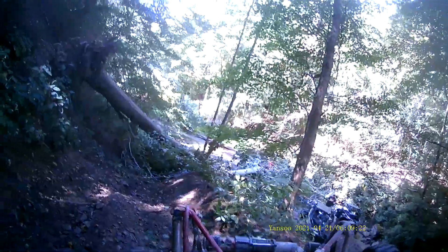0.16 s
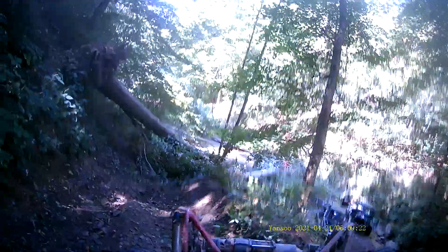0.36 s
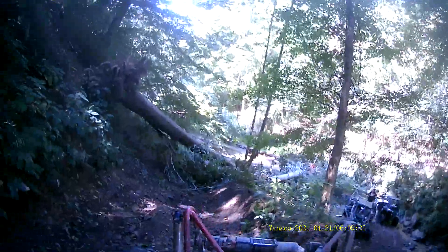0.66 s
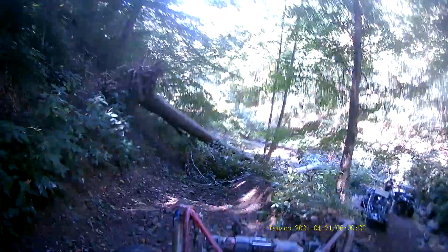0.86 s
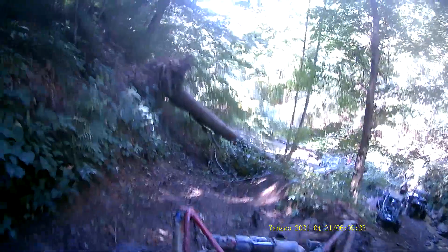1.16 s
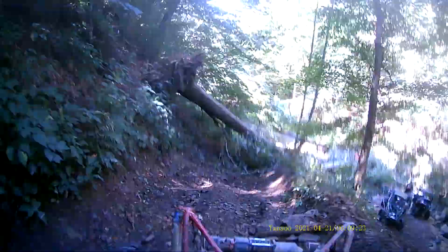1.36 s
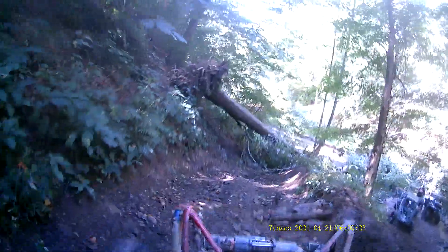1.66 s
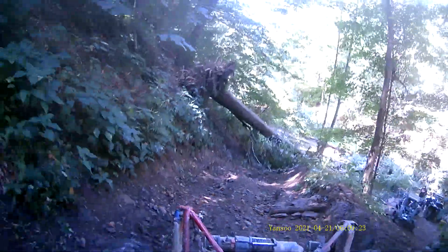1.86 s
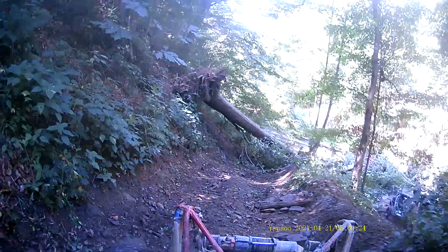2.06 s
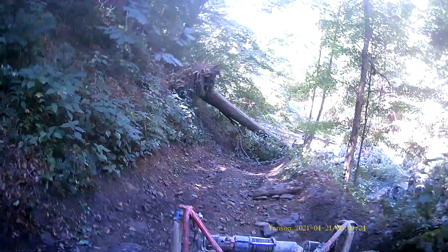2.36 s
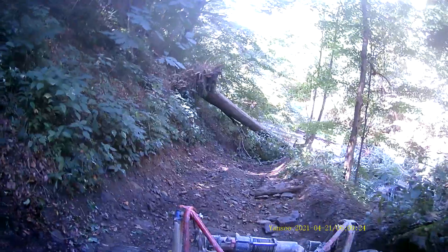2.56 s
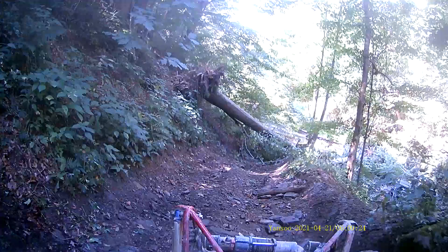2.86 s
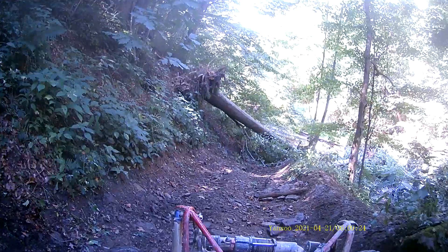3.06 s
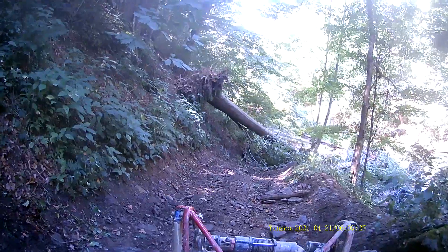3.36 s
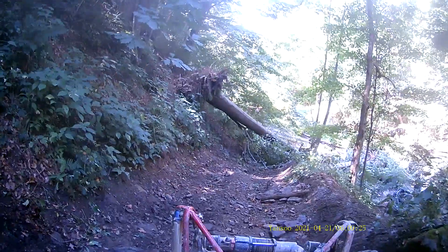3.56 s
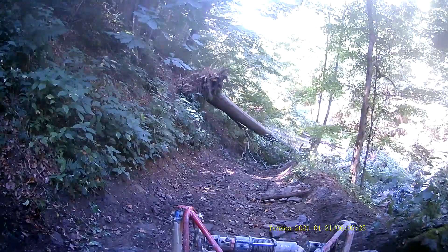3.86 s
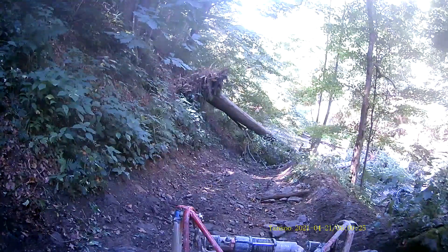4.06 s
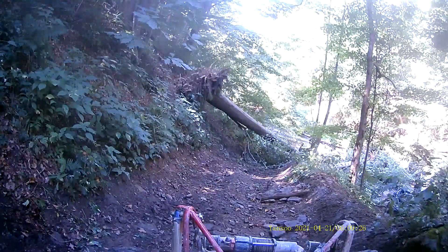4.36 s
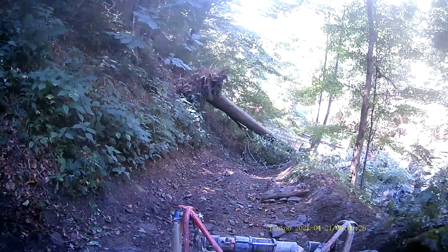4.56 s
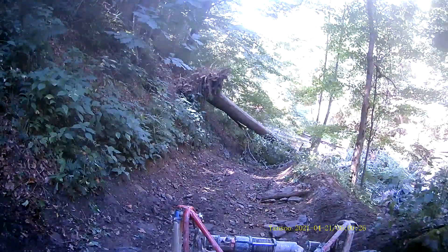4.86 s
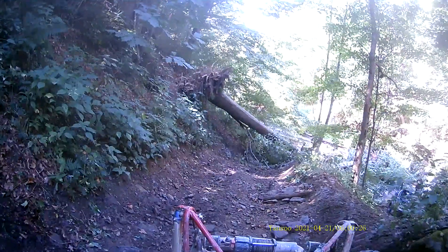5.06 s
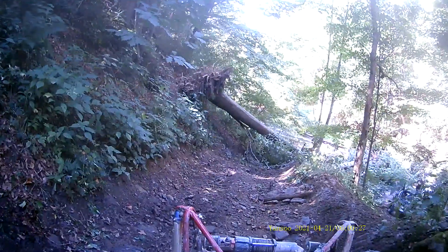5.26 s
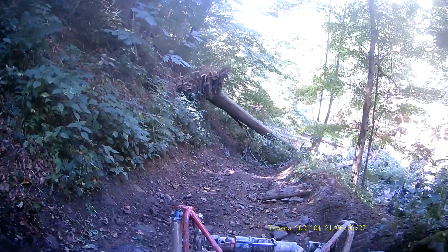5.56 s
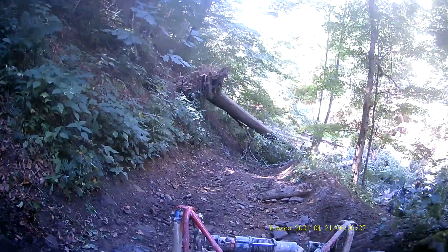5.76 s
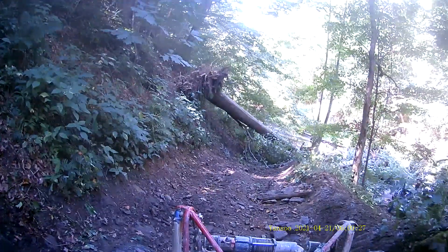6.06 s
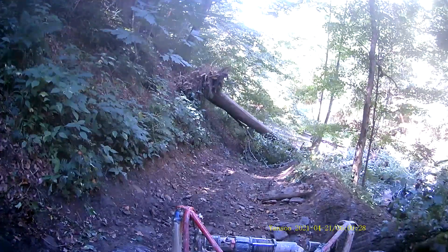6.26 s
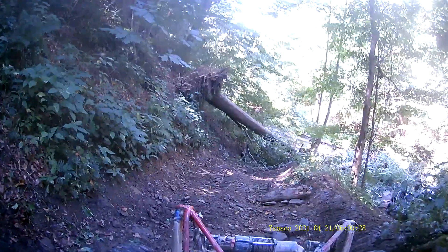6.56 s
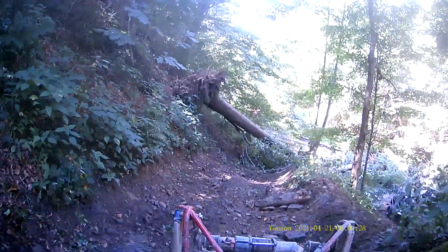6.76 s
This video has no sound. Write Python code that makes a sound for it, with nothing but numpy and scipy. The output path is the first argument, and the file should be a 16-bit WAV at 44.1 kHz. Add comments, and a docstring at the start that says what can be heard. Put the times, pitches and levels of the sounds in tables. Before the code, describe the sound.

Heard from a microphone on the frame of a small buggy on a wooded dirt trail: a two-cylinder engine growls, drops quickly to a chugging idle with gear rumble and loose metal knocks, putters steadily, nearly stalls, revs hard, falls back and starts to pick up. The sound is dull, narrow-band and flattened by overload.

```python
"""Small buggy engine, heard up close

A two-cylinder engine drops from a rev to idle, stumbles, revs hard, coasts down and picks up again.
Each firing is a pulse that rings the silencer and pipe; filtered noise makes the gas puffs and gear rumble.
Loose metal knocks are fading tones with bursts of noise, a bump is one low tone, a squeak two gliding ones.
An overloaded microphone on the frame flattens the peaks, at a low sample rate and again at the full one."""
import sys
import numpy as np
from scipy import signal
from scipy.fft import rfft, irfft, next_fast_len
from scipy.io import wavfile
from scipy.ndimage import uniform_filter1d

SR = 44100
rng = np.random.default_rng(int(sys.argv[2]) if len(sys.argv) > 2 else 0)


def waveform_to_disk(signal):
    """Save audio, clipped to [-1, 1], as 16-bit WAV at the path in sys.argv[1]."""
    frames = np.transpose(np.atleast_2d(signal))
    scaled = np.clip(frames, -1, 1) * 32767
    samples = np.round(scaled).astype(np.int16)
    wavfile.write(sys.argv[1], SR, samples)


def to_linear_factor(level_db):
    """Convert decibel levels (scalar or array-like) to linear amplitude factors."""
    exponent = np.asarray(level_db, float) / 20
    return 10 ** exponent


N = 305172  # length in samples

# A thin squeak. Each row: start in seconds, length in seconds, first pitch in Hz, last pitch in Hz, level in dB.
SQUEAKS = [(4.05, .15, 2850, 2930, -43), (4.22, .07, 2810, 2790, -47)]
# Knocks of loose metal. Each row: time in seconds, level in dB, extra dB for the tones under 2 kHz.
KNOCKS = [(.703, -13, 6), (1.117, -18, -2), (1.349, -21, -9), (1.971, -22, -8), (2.986, -24, 9),
          (5.119, -20, 6), (6.305, -21, 2), (6.565, -21, 3)]
# Tones of the loose metal. Each row: pitch in Hz, relative level in dB, time to fade by 60 dB in seconds.
METAL_TONES = [(720, -2, .04), (1300, 0, .03), (1750, -5, .025), (2600, -5, .025), (3700, -5, .025)]
# Bumps of the frame. Each row: start in seconds, level in dB before its fade and soft onset, pitch in Hz.
BUMPS = [(4.755, 2, 103)]
# Gear noise. Each row: time in seconds, level in dB.
GEAR_NOISE = [(0, -6), (.5, -11), (.68, -18), (.9, -17), (1.5, -28), (2.5, -30), (5, -35), (5.3, -23),
              (5.9, -21), (6.05, -18), (6.4, -19), (6.7, -13.5), (6.92, -11)]
# Resonances of the gear casing. Each row: centre in Hz, width in Hz, relative strength with its sign.
CASING_MODES = [(312, 414, 0.84), (496, 154, -1.313), (713.4, 47, 0.7), (1330, 270, -0.18)]
# Engine speed. Each row: time in seconds, firings per second.
FIRING_RATE = [(0, 95), (.14, 89), (.21, 84.5), (.28, 86.5), (.42, 83.8), (.49, 75.8), (.56, 63),
               (.7, 46.8), (.77, 43.7), (.98, 47.5), (1.3, 46.4), (2.4, 37.7), (3.4, 37.2), (4.15, 36.1),
               (4.96, 36.4), (5.08, 29.8), (5.2, 52.8), (5.32, 70.3), (5.44, 81.8), (5.56, 88.5),
               (5.62, 89.7), (5.88, 88.2), (5.94, 85), (6.1, 70.7), (6.22, 57.8), (6.4, 44.3), (6.46, 40),
               (6.51, 31.5), (6.64, 41.2), (6.88, 69.3), (6.92, 73)]
# Unevenness of the firings. Each row: time in seconds, unevenness from 0 to 1.
UNEVENNESS = [(0, .14), (.15, .19), (.6, .18), (1.2, .07), (4.88, .065), (5, .24), (5.17, .14),
              (5.33, .045), (5.55, .02), (5.92, .025), (6.1, .045), (6.6, .15), (6.92, .12)]
# Throttle. Each row: time in seconds, opening in dB relative to idle.
THROTTLE_OPENING = [(0, 13.5), (.35, 19), (.5, 6.5), (.9, 6), (1.3, 3.5), (2.3, -0.5), (4.93, -0.5),
                    (5.04, -10.5), (5.11, 0.5), (5.2, 10.5), (5.5, 26), (5.92, 17), (6.03, 10.5),
                    (6.45, -4), (6.56, 7.5), (6.7, 12), (6.77, 10), (6.92, 11.5)]
# The throttle shuts and the pipe goes quiet. Each row: start in seconds, length in seconds, depth in dB.
THROTTLE_LIFTS = [(0.542, .09, 9), (4.999, .11, 5.5), (5.995, .14, 11), (6.45, .25, 15)]
# Resonances of the silencer chamber. Each row: centre in Hz, width in Hz, relative strength with its sign.
COOL_SILENCER = [(50.34, 15.47, 0.63), (79.24, 20.1, -0.2995)]
# The chamber after hard work. Each row: centre in Hz, width in Hz, relative strength with its sign.
WARM_CHAMBER = [(51.76, 20.4, 0.27), (89.2, 15.4, -0.32)]
# Resonances of the cool pipe. Each row: centre in Hz, width in Hz, relative strength with its sign.
COOL_PIPE = [(146.03, 30, -0.29), (161.94, 32.4, 0.43), (225, 59.15, -0.552), (252.17, 32.7, 0.523),
             (305.7, 16.7, 0.17), (368, 18, 0.079), (482, 40, 0.026), (659, 56, 0.0045)]
# Hot gas carries sound faster, so the pipe rings higher. Each row: centre in Hz, width in Hz, signed strength.
HEATED_PIPE = [(181.5, 40, 0.24), (257.7, 53, -0.72), (350.8, 55, 0.104), (550, 300, -0.046),
               (722, 210, 0.0021)]
# Tone colour of the exhaust turbulence. Each row: frequency in Hz, relative level in dB.
GAS_COLOUR = [(60, -24), (200, -2.5), (400, -11.5), (700, -14.5), (1200, -21.5), (2000, -44.5),
              (3500, -39.5), (4500, -45.5)]
# Filter of the stretch to the full sample rate. Each row: frequency in Hz, gain in dB.
STRETCH_FILTER = [(20, 0), (3750, 0), (4000, -5), (4300, -19), (4600, -45), (5000, -120)]

# casing ring: level in dB; gear noise in dB under which it weakens, and by how many dB per dB
RING_DB, RING_KNEE_DB, RING_FALLS = -24.5, -15.5, 1.7
# difference between the two cylinders, 0-1: at idle and in a clean fast run
TWIN_IDLE, TWIN_CLEAN = .05, .3
# a run begins to count as clean under this unevenness and above this many firings per second
CLEAN_BELOW, CLEAN_FROM_HZ = .07, 72
LIFT_EDGE_S = .085  # how long a throttle lift takes to set in or clear
BARK_DB, BARK_GROWS = -4, .7  # pipe level at idle; dB per dB of throttle
# silencer level at idle in dB; dB per dB of throttle; dB per dB of lift
THUMP_DB, THUMP_GROWS, THUMP_SWELLS = -4, 0.15, 0.33
COOLING_S = 0.85  # how slowly the chamber follows the throttle
# fired faster than this under power, and more evenly than this, the silencer cannot follow
THUMP_FADES_HZ, THUMP_FADE_DB_PER_HZ, SMOOTH_BELOW = 71, 0.33, 0.1
# the engine nearly stalls and the thump weakens too; too short to reach this full depth
STUMBLE_S, STUMBLE_LENGTH_S, STUMBLE_DB = 4.98, 0.066, 10.5
GAS_DB, GAS_GROWS = -21, .85  # turbulence at idle; dB per dB of throttle
GAS_CALMS_DB, CALM_BELOW = 7, .06  # even firings stir it less: at most this much, under this unevenness
# amplifier resting level at idle, at full throttle and at the start; its lag in seconds
REST_IDLE, REST_OPEN, REST_START, REST_LAG_S = -.06, .035, .03, 1.1
FULL_SCALE = .708  # largest value a converter can hold
UP, DOWN = 441, 80  # ratio of the full sample rate to the low one, 8000 Hz


def unit(x):
    """Scale to rms 1."""
    return x / np.sqrt(np.mean(x ** 2) + 1e-20)


def levelled(x, span_s):
    """Scale to about rms 1 at every moment, judged over a sliding span."""
    power = np.abs(uniform_filter1d(x ** 2, size=int(span_s * SR)))
    return x / np.sqrt(power + 1e-20)


def along(points, hz):
    """Read a list of (Hz, value) points, with straight lines on a log frequency axis."""
    f, v = np.transpose(points)
    return np.interp(np.log(hz + 1), np.log(f + 1), v)


def curve(rows):
    """Join (seconds, value) points into one value per sample."""
    s, value = np.transpose(rows)
    return np.interp(np.arange(N) / SR, s, value)


def filtered(x, response):
    """Filter x by a response given as a function of frequency."""
    m = next_fast_len(N + SR // 2)
    return irfft(rfft(x, m) * response(np.fft.rfftfreq(m, 1 / SR)), m)[:N]


def modes(table):
    """Response of a set of resonances, each ringing on after it is struck."""
    return lambda f: sum(g * 1j * f * w / (c * c - f * f + 1j * f * w) for c, w, g in table)


def plateau(start_s, length_s, edge_s):
    """Rise towards 1 and fall back to 0, with sloped edges centred on the start and the end."""
    t = np.arange(N) / SR - start_s
    return np.clip(np.minimum(t, length_s - t) / edge_s + .5, 0, 1)


def lagged(x, lag_s, start):
    """Follow x slowly, from a starting value."""
    keep = np.exp(-1 / (lag_s * SR))
    return signal.lfilter([1 - keep], [1, -keep], x, zi=[start])[0]


def squeak():
    """A faint whistle in two parts, each a sine whose pitch glides evenly."""
    out = np.zeros(N)
    for start, length, first_hz, last_hz, db in SQUEAKS:
        t = np.arange(N) / SR - start
        turns = first_hz * t + (last_hz - first_hz) * t ** 2 / (2 * length)
        out += to_linear_factor(db) * plateau(start, length, .02) * np.sin(2 * np.pi * turns)
    return out


def frame():
    """Loose parts ring and crack in a short double knock; a bump gives one low note."""
    out = np.zeros(N + SR)
    t = np.arange(SR // 5) / SR
    for s, db, body_db in KNOCKS:
        for delay, bounce_db in [(0, 0), (.01, -2)]:  # seconds, dB
            ring = 0
            for hz, level, t60 in METAL_TONES:
                tone_db = level + body_db * (hz < 2000) + rng.normal(0, 1) - 60 * t / t60
                ring = ring + to_linear_factor(tone_db) * np.sin(2 * np.pi * hz * t)
            crack = to_linear_factor(-60 * t / 0.012) * rng.standard_normal(len(t))
            out[round((s + delay) * SR):][:len(t)] += to_linear_factor(db + bounce_db) * (ring + crack)
    for s, db, hz in BUMPS:
        soft_onset = 1 - np.exp(-t / .008)
        bump = to_linear_factor(db - 60 * t / .16) * soft_onset * np.sin(2 * np.pi * hz * t)
        out[round(s * SR):][:len(t)] += bump
    return out[:N]


def driveline(pulses):
    """The gear casing rings with unbroken rolling noise and with every firing."""
    rolling_db = curve(GEAR_NOISE)
    ring_db = RING_DB - RING_FALLS * np.clip(RING_KNEE_DB - rolling_db, 0, 6)
    rumble = unit(filtered(rng.standard_normal(N), modes(CASING_MODES)))
    # of the firings, only the third mode (the wall) is used
    ring = levelled(filtered(pulses, modes(CASING_MODES[2:3])), span_s=0.21)
    return to_linear_factor(rolling_db) * rumble + to_linear_factor(ring_db) * ring


def firings(rate):
    """One impulse per firing, uneven in size and moment; also the running count of firings."""
    cycle = np.cumsum(rate) / SR
    k = np.arange(1, int(cycle[-1]) + 1)
    at = np.interp(k, cycle, np.arange(N)).astype(int)
    uneven = curve(UNEVENNESS)[at]
    even_enough = np.clip(2 - 2 * uneven / CLEAN_BELOW, 0, 1)
    fast_enough = np.clip((rate[at] - CLEAN_FROM_HZ) / 15, 0, 1)
    differ = TWIN_IDLE + (TWIN_CLEAN - TWIN_IDLE) * even_enough * fast_enough
    twin = differ * (-1) ** k  # the two cylinders take turns
    luck = rng.standard_normal((len(k), 2))
    size = to_linear_factor(11 * uneven * luck[:, 0]) * (1 + twin)
    shift = .08 * uneven * luck[:, 1] + 0.059 * twin  # as a part of one firing interval
    at = np.clip(at + shift * SR / rate[at], 0, N - 1)
    return np.bincount(at.astype(int), size, N), cycle


def engine(pulses, cycle, rate):
    """Each firing thumps the silencer, rings the pipe and blows a puff of turbulence."""
    opening_db = curve(THROTTLE_OPENING)
    uneven = curve(UNEVENNESS)
    lift_db = sum(db * plateau(s, length, LIFT_EDGE_S) for s, length, db in THROTTLE_LIFTS)
    heat = np.clip(opening_db / 15 - .15, 0, 1)
    warm = np.clip(1.77 * lagged(heat, COOLING_S, 0.64) - .1, 0, 1)

    # sound of each part: cool and hot resonances are mixed by the heat
    cool_thump = (1 - warm) * filtered(pulses, modes(COOL_SILENCER))
    warm_thump = warm * filtered(pulses, modes(WARM_CHAMBER))
    thump = levelled(cool_thump + warm_thump, span_s=0.21)
    cool_bark = (1 - heat) * filtered(pulses, modes(COOL_PIPE))
    hot_bark = heat * filtered(pulses, modes(HEATED_PIPE))
    bark = levelled(cool_bark + hot_bark, span_s=0.34)
    puff = 0.35 + np.exp(-2.2 * ((cycle - .15) % 1))
    gas = unit(filtered(puff * rng.standard_normal(N), lambda hz: to_linear_factor(along(GAS_COLOUR, hz))))

    # level of each part
    calm = np.clip(1 - uneven / CALM_BELOW, 0, 1)
    gas_db = GAS_DB + GAS_GROWS * opening_db - GAS_CALMS_DB * calm
    bark_db = BARK_DB + BARK_GROWS * opening_db - lift_db
    smooth = np.clip(1 - uneven / SMOOTH_BELOW, 0, 1)
    fade_db = THUMP_FADE_DB_PER_HZ * heat * np.maximum(rate - THUMP_FADES_HZ, 0) * smooth
    stumble_db = STUMBLE_DB * plateau(STUMBLE_S, STUMBLE_LENGTH_S, LIFT_EDGE_S)
    thump_db = THUMP_DB + THUMP_GROWS * opening_db + THUMP_SWELLS * lift_db - fade_db - stumble_db
    return to_linear_factor(thump_db) * thump + to_linear_factor(bark_db) * bark + to_linear_factor(gas_db) * gas


def scene():
    """Squeak, frame, driveline and engine at one microphone."""
    rate = curve(FIRING_RATE)
    pulses, cycle = firings(rate)
    pulses = filtered(pulses, lambda hz: 1 / (1 + (hz / 900) ** 4))  # the valve opens softly: no click
    return (squeak() + frame() + driveline(pulses) + engine(pulses, cycle, rate))[None]


def resting_level():
    """The amplifier's rest point creeps after the engine load, here the throttle opening."""
    target = np.interp(curve(THROTTLE_OPENING), [-3, 15], [REST_IDLE, REST_OPEN])
    return lagged(target, REST_LAG_S, REST_START)


def band_limit(x):
    """A steep low-pass at the top of the band."""
    return signal.sosfilt(signal.butter(12, 15900, fs=SR, output="sos"), x)


def record(dry):
    """The amplifier saturates, a slow converter clips, and the stretch to full rate can overshoot and clip."""
    amplified = np.clip(dry[0], -.705, .705) + resting_level()
    slow = np.clip(signal.resample_poly(amplified, DOWN, UP), -FULL_SCALE, FULL_SCALE)
    hz = np.fft.rfftfreq(N, 1 / SR)
    mirrored = np.resize(np.fft.fft(slow), len(hz)) * UP / DOWN  # the slow spectrum repeats upward
    stretched = irfft(mirrored * to_linear_factor(along(STRETCH_FILTER, hz)), N)
    full = np.clip(stretched, -FULL_SCALE, FULL_SCALE)
    return band_limit(full[None])


dry = scene()
out = record(dry)
waveform_to_disk(out)
```